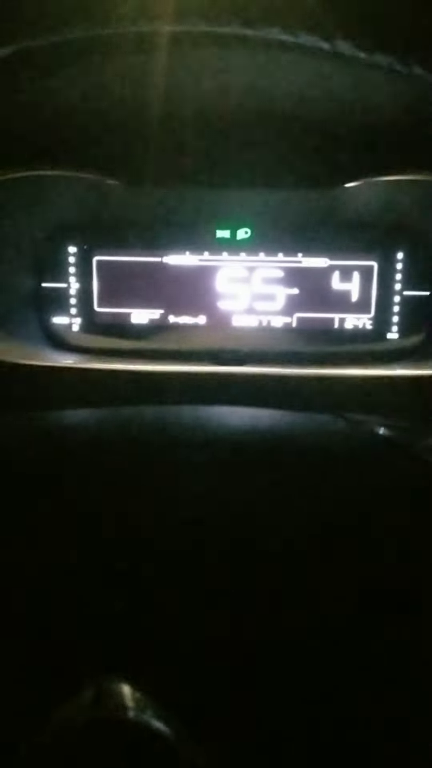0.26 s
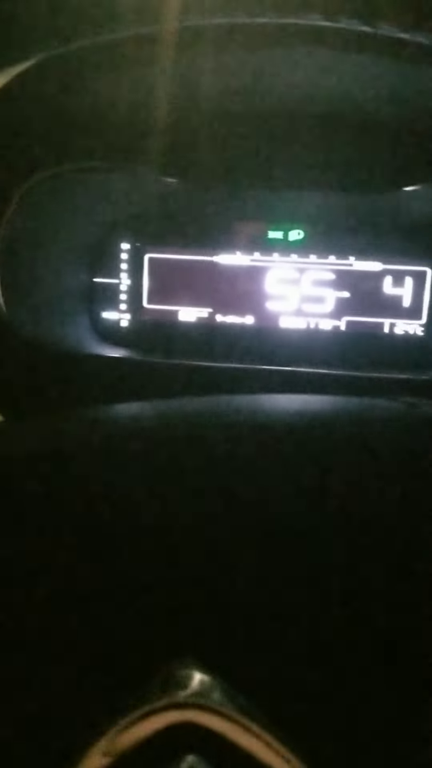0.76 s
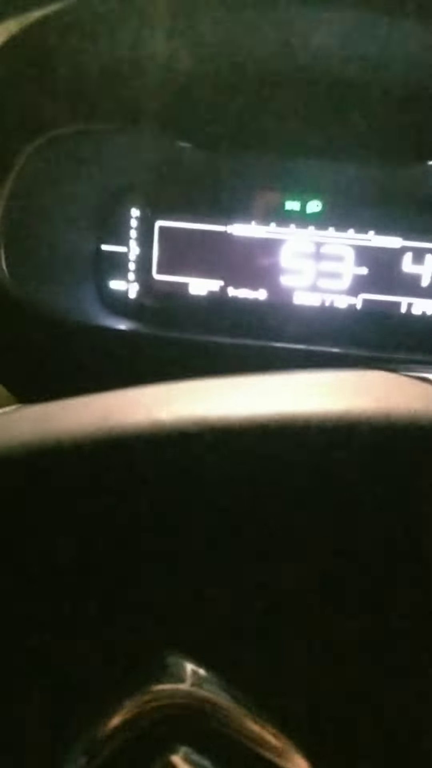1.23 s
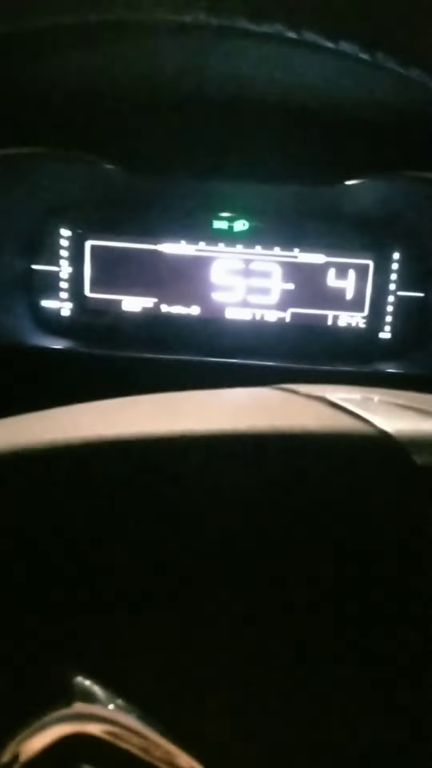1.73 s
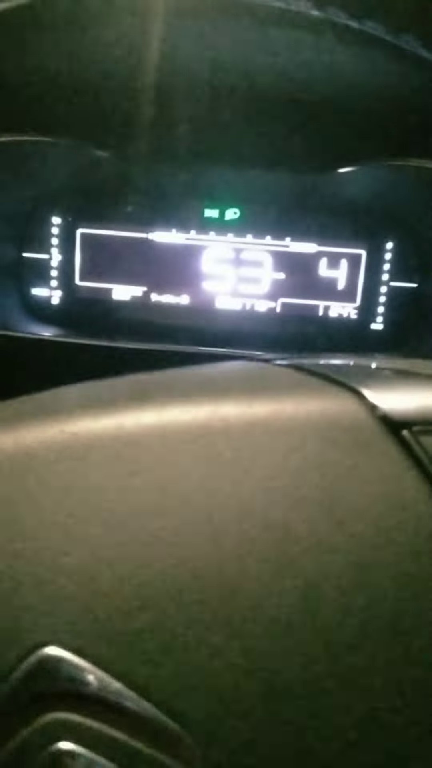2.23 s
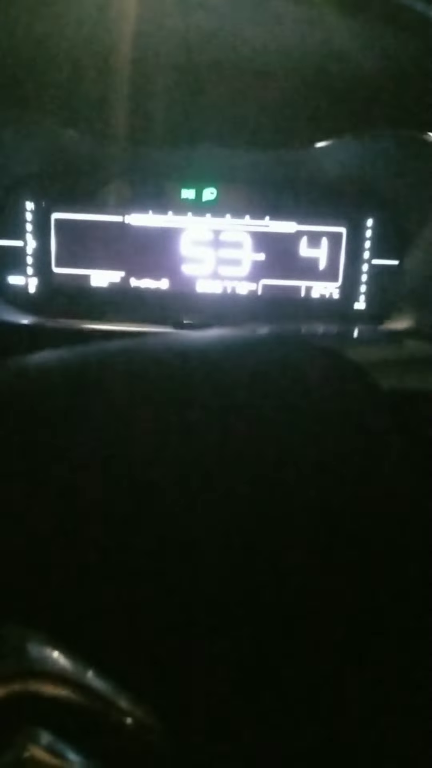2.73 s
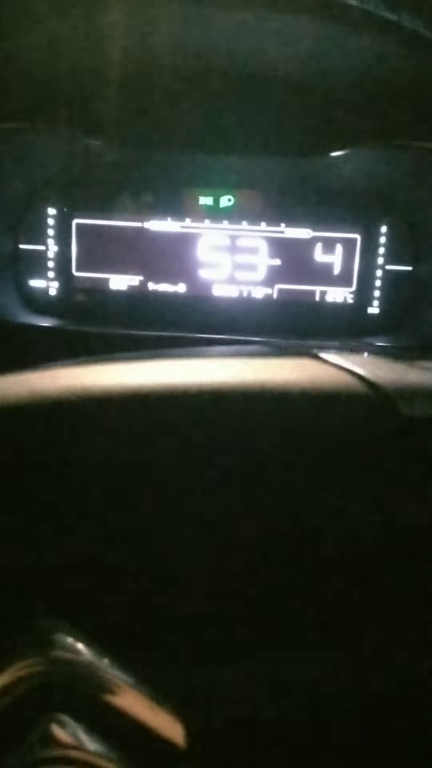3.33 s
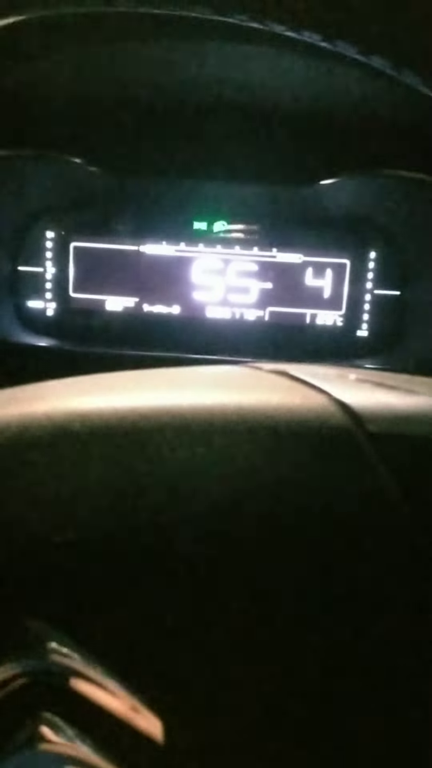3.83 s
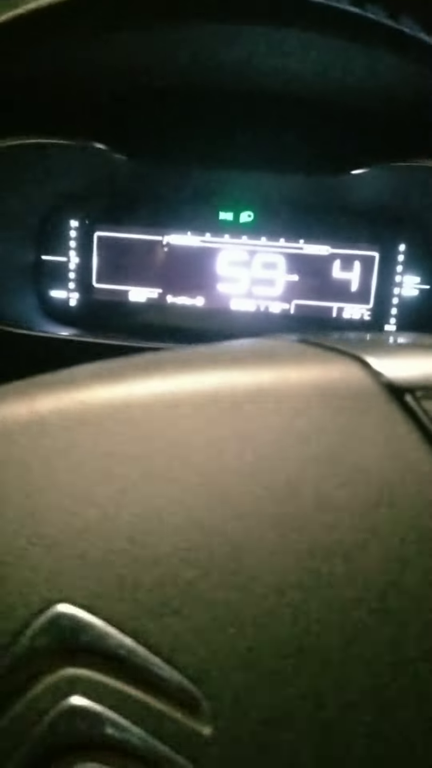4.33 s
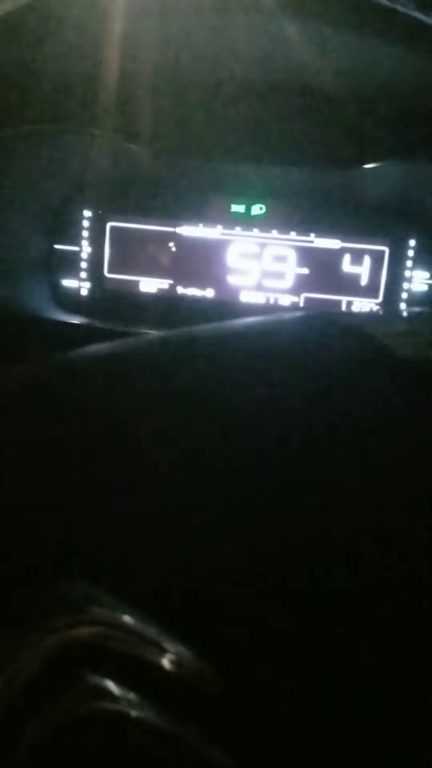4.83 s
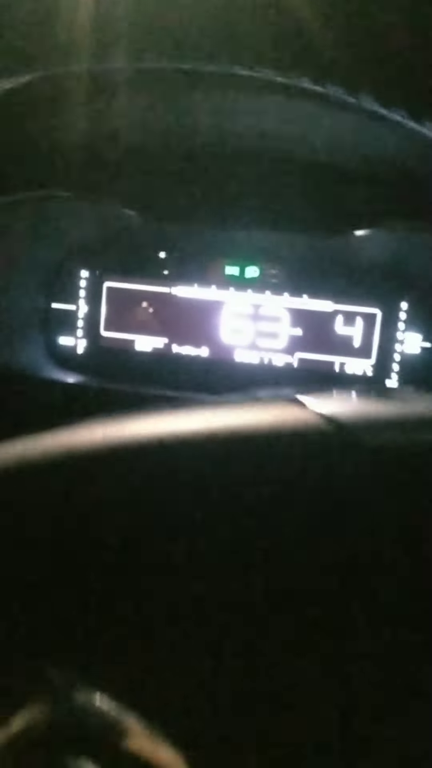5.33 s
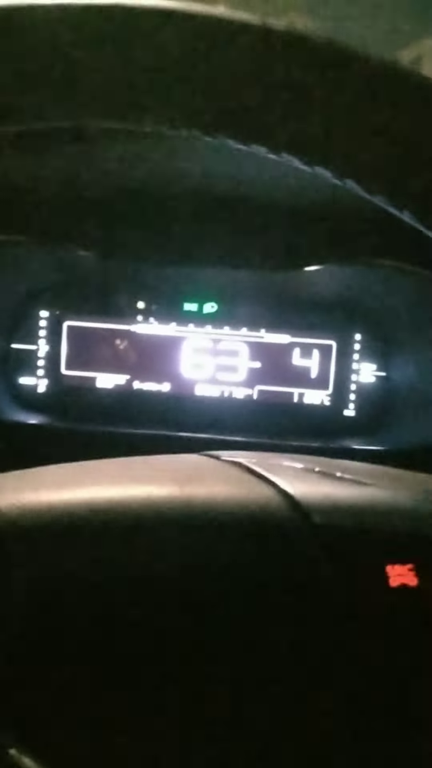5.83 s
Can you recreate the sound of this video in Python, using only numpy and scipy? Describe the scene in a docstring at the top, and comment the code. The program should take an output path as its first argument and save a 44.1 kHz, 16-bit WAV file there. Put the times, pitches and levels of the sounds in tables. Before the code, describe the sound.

Heard from the driver's seat, a turbocharged car coasts with a low engine hum and steady road rumble. The trim knocks once as the throttle opens, and the engine growls gradually higher while a faint turbo hiss climbs. The throttle then shuts, and the turbo flutters in a quick run of chattering puffs, mixed with a few trim knocks and followed by faint, thin wheezes.

```python
"""Turbo pull and flutter, from the driver's seat

A small turbocharged car coasts at town speed, pulls for a few seconds, then the throttle shuts.
Engine hum and road rumble fill the cabin; the turbo's hiss climbs with its wheel speed, then trapped
boost flutters back through the intake and trails off in thin wheezes. Trim ticks and rustles.
Two microphone ports hear the bass alike and the treble apart."""
import sys
import numpy as np
from scipy import signal
from scipy.fft import rfft, irfft, next_fast_len
from scipy.io import wavfile

SR = 44100
rng = np.random.default_rng(int(sys.argv[2]) if len(sys.argv) > 2 else 0)


def waveform_to_disk(signal):
    """Save audio, clipped to [-1, 1], as 16-bit WAV at the path in sys.argv[1]."""
    frames = np.transpose(np.atleast_2d(signal))
    scaled = np.clip(frames, -1, 1) * 32767
    samples = np.round(scaled).astype(np.int16)
    wavfile.write(sys.argv[1], SR, samples)


N = 267246
TIME = np.arange(N) / SR
FFT_SIZE = next_fast_len(N + 8192)
HZ = np.maximum(np.arange(FFT_SIZE // 2 + 1) * SR / FFT_SIZE, 1)

# How hard the engine works. Each row: time in seconds, load from 0 to 1.
LOAD = [(0, 0.24), (2.55, 0.43), (2.75, 0.46), (3.2, 0.55), (3.7, 0.81), (4.3, 0.81), (5.02, 0.91),
        (5.1, 0.61), (5.5, 0.6), (6.06, 0.44)]


def engine():
    """Wavering tones ride the firing rate; a roar through the bulkhead throbs with each firing."""
    # Engine speed. Each row: time in seconds, firings per second.
    firing_curve = [(0.0, 59.7), (1.0, 59.2), (2.5, 59.1), (2.9, 60.1), (3.5, 62.9), (4.0, 66.4),
                    (4.5, 69.6), (5.05, 73.8), (5.4, 73.6), (6.06, 69.5)]
    # Hum at the firing rate. Each row: time in seconds, level in dB.
    hum_curve = [(0, -30.5), (.5, -28.5), (1.9, -27.5), (2.4, -31), (2.7, -44), (2.95, -33), (3.45, -33.5),
                 (3.8, -37), (4.2, -33), (4.9, -28), (5.15, -32), (5.5, -39), (5.75, -32), (6.06, -33)]
    # Growl near a resonance, throttle open. Each row: firing multiple, base level in dB,
    # level of the added swell in dB, resonance in Hz, width in Hz.
    growls = [(2, -50, -32, 119, 11), (3, -55.5, -34.5, 188, 24)]
    # Overtones. Each row: firing multiple, coasting level in dB, level at full pull in dB.
    overtones = [(1.5, -50, -47), (4, -64, -56), (4.5, -70, -62), (5, -76, -63), (5.5, -80, -63),
                 (6, -72, -61), (7, -82, -59), (8, -70, -61), (9, -84, -59), (10, -84, -60),
                 (11, -86, -58.5), (12, -84, -64), (13, -84, -68), (14, -86, -72), (15, -88, -70),
                 (16, -88, -72)]
    # Gear whine: one more row of the same kind.
    gear_whine = (14.25, -90, -61)
    # The tenth multiple sings while coasting, then fades. Each row: time in seconds, level in dB.
    tenth_curve = [(0, -66), (.3, -62), (1.3, -63), (1.7, -80), (6.06, -90)]
    # Tone of the roar. Each row: frequency in Hz, noise density in dB.
    roar_spectrum = [(200, -83), (320, -71), (500, -71), (750, -76), (1100, -79), (1500, -93.5),
                     (2500, -106), (3500, -114)]
    firing_hz = envelope(firing_curve)
    phase = 2 * np.pi * np.cumsum(firing_hz) / SR

    def partial(multiple, gain):
        wander = rng.uniform(0, 2 * np.pi) + .055 * multiple * drift(6)
        return np.sqrt(2) * gain * amp(1.1 * drift(12)) * np.sin(multiple * phase + wander)

    hum = partial(1, amp(envelope(hum_curve)))
    for multiple, base_db, swell_db, hz, width in growls:
        nearness = np.sqrt(resonance(multiple * firing_hz, hz, width))
        hum += partial(multiple, amp(base_db) + throttle() * amp(swell_db) * nearness)
    whine = sum(partial(multiple, amp(coast_db + (pull_db - coast_db) * pull()))
                for multiple, coast_db, pull_db in overtones + [gear_whine])
    whine += partial(10, amp(envelope(tenth_curve)))
    # Overtones bloom as they cross the cabin's resonances.
    tones = padded_spectrum(hum) + padded_spectrum(whine) * cabin_colour() ** 2
    throb = 1 + .35 * np.sin(phase)
    roar = envelope(LOAD) ** 1.5 * throb * noise(density(roar_spectrum) * cabin_colour())
    return mic_ports(tones, 1j * tones) + roar


def turbo():
    """Compressor hiss over a broader, lower rush; both rise in pitch and level with wheel speed."""
    # Pitch of the compressor's hiss. Each row: time in seconds, centre in Hz.
    wheel_curve = [(0, 3526), (3, 4175), (3.8, 5300), (4.4, 5900), (4.7, 6280), (5.05, 6700), (5.3, 6380),
                   (5.6, 6150), (6.06, 5860)]
    centre_hz = envelope(wheel_curve)
    phase = 2 * np.pi * np.cumsum(centre_hz) / SR
    hiss = np.zeros((2, N))
    for pitch_ratio, half_width_hz, layer_db in [(.99, 570, -1.5), (.72, 1100, .5)]:
        lowpass = signal.butter(3, half_width_hz, fs=SR, output="sos")
        rush = signal.sosfilt(lowpass, rng.standard_normal((2, N)))
        shifted_up = np.sqrt(2) * rush / np.std(rush) * np.sin(pitch_ratio * phase)
        hiss += amp(layer_db + 1.5 * drift(30)) * shifted_up
    db_per_octave, open_throttle_db = 25.5, 2
    level_db = -77 + db_per_octave * np.log2(centre_hz / 6700) + open_throttle_db * throttle()
    return hiss * amp(level_db) * pan(left_db=5)


def intake_flutter():
    """Air makes the intake pipe sing: softly under load, then in torn puffs as boost escapes."""
    # Boost puffing backwards. Each row: start in seconds, length in seconds, level in dB.
    puffs = [(5.065, 0.05, -61.5), (5.097, .062, -56.5), (5.146, 0.074, -58.5), (5.215, 0.072, -56.5),
             (5.288, 0.066, -57.5), (5.348, 0.068, -57.5), (5.41, 0.075, -63.5)]
    # Pipe resonances; the low ones take over as boost runs out. Each row: pitch in Hz, width in Hz,
    # then gain in dB under load and at the first puff, mid-flutter and the last puff.
    pipe_modes = [(905, 45, -2, 2, 4, 5.5), (1176, 28, -3, -6, 8.5, 8), (1330, 110, -5, 1, -3, -7),
                  (1577, 70, -9.5, -1.5, -3, -9.5), (2010, 75, -11, -4, -8, -11),
                  (2200, 100, -16, -8, -15, -20), (2925, 60, -12, -13, -19, -17),
                  (3025, 120, -19, -15, -19, -25), (3450, 180, -20.5, -17, -22, -20),
                  (4040, 250, -18, -16, -32, -32), (5460, 300, -23, -30, -32, -32)]
    breath = amp(-71.5) * envelope(LOAD) ** 2
    torn_air = amp(2 * drift(70)) * sum(amp(db) * swell(start, length) ** 2
                                        for start, length, db in puffs)
    first_s, last_s, lowest_hz = puffs[0][0], puffs[-1][0], pipe_modes[0][0]
    song = np.zeros(N)
    for hz, width, load_db, *puff_db in pipe_modes:
        puff_gain = amp(np.interp(TIME, [first_s, (first_s + last_s) / 2, last_s], puff_db))
        tone = rng.standard_normal(N) * (breath * amp(load_db) + torn_air * puff_gain)
        radius = np.exp(-1.5 * np.pi * width / SR)
        feedback = [1, -2 * radius * np.cos(2 * np.pi * hz / SR), radius ** 2]
        for _ in range(2):   # twice, for dark valleys between the resonances
            tone = signal.lfilter([1, 0, -1], feedback, tone + 1e-18) * (1 - radius ** 2) / 2
        rasp_db = 1.25 * np.log2(hz / lowest_hz) * drift(300)   # torn air roughens the higher modes
        song += np.sqrt(SR / width / 2) * tone * amp(rasp_db)
    # Each puff carries a chuff of untuned air, darker than the one before.
    first_chuff_hz, fall_octaves_per_s = 1650, 2.6
    chuffs = gusts([(start, length, db - 4, first_chuff_hz * 2 ** (fall_octaves_per_s * (first_s - start)))
                    for start, length, db in puffs], octaves=1.3)
    return in_cabin(song, t60=.04, echo_db=-6, left_db=2.5) + chuffs


def wheezes():
    """Thin, high whistles of narrow noise trail the flutter."""
    # Each row: start in seconds, length in seconds, level in dB, centre in Hz.
    whistles = [(5.475, 0.06, -81.5, 7900), (5.585, 0.058, -80, 7450), (5.74, 0.07, -87, 7050),
                (5.66, 0.18, -91, 8400), (5.83, .25, -90, 8750)]
    return gusts(whistles, octaves=.03)


def road():
    """Suspension thud, cabin boom and tyre hiss follow the surface; the boom swells on a hard pull."""
    # Roughness of the road. Each row: time in seconds, level swing in dB.
    surface_curve = [(0, -0.5), (.15, 4), (.4, 0.5), (1.3, -0.5), (2.2, -2), (3.0, 1), (3.7, -1.5),
                     (4.0, 1.5), (4.3, 0), (4.6, 6), (4.9, -0.5), (5.2, 4.5), (5.5, 2.5), (6.06, 4.5)]
    # Tone of the suspension's thud. Each row: frequency in Hz, noise density in dB.
    thud_spectrum = [(12, -100), (22, -77), (30, -64), (42, -52), (58, -55), (72, -51.5), (85, -51.5),
                     (110, -54.5), (170, -60.5), (260, -73)]
    # Tone of the tyres. Each row: frequency in Hz, noise density in dB.
    tyre_spectrum = [(100, -76.5), (200, -65), (350, -71), (600, -80), (1000, -87.5), (1400, -90),
                     (2000, -102), (2600, -114)]
    surface_db = envelope(surface_curve)
    tyres = amp(.68 * surface_db) * noise(density(tyre_spectrum) * cabin_colour())
    thud = amp(.8 * surface_db) * noise(density(thud_spectrum) * cabin_colour())
    boom = amp(-50 + .4 * surface_db + 3.5 * pull()) * noise(resonance(HZ, centre=125.1, width=15.3))
    return thud + boom + tyres


def trim_ticks():
    """The trim ticks and knocks: single clicks softened by a broad band-pass."""
    # Each row: time in seconds, peak level in dB, centre in Hz, width in octaves.
    hits = [(2.6158, -33, 700, 1.56), (2.616, -52.5, 2500, 1.3), (2.641, -57, 2600, .7),
            (5.164, -51, 2200, .5), (4.549, -54, 1710, .9), (5.1592, -35, 600, 1.5),
            (5.1624, -28.5, 380, 1.3), (5.1672, -28.5, 510, 0.97), (5.19, -33, 416, 0.54),
            (5.208, -30, 447, 0.52)]
    clicks = np.zeros(N)
    for start, db, hz, octaves in hits:
        impulse = (np.arange(N) == round(start * SR)) + 1e-18
        click = band(band(impulse, hz, octaves), hz, octaves + 1)
        clicks += amp(db) * click / np.abs(click).max()
    return in_cabin(clicks, t60=.02, echo_db=-7, left_db=.5)


def trim_rustles():
    """The trim rustles in short, bright brushes of noise."""
    # Each row: start in seconds, length in seconds, level in dB, centre in Hz.
    brushes = [(2.865, 0.027, -78, 5500), (4.08, .025, -73, 4000), (4.82, 0.018, -63.5, 4300),
               (4.885, 0.019, -73, 7100), (4.955, 0.024, -71, 6800), (5.09, 0.051, -68, 3900),
               (5.115, 0.015, -73, 8500), (5.16, 0.025, -73, 8400), (5.235, 0.023, -74, 8500),
               (5.31, 0.022, -63.5, 4500), (5.40, .015, -73, 4000), (5.47, 0.15, -80.5, 8600)]
    return gusts(brushes, octaves=1)


def wind():
    """Faint wind flickers at the window seals, a little louder under load."""
    # Tone of the wind. Each row: frequency in Hz, noise density in dB.
    wind_spectrum = [(1200, -125), (2100, -106), (2800, -108), (4200, -115), (5600, -119), (7000, -120.5),
                     (8000, -121), (13000, -120.5)]
    return amp(3 * envelope(LOAD) + 1.4 * drift(60)) * noise(density(wind_spectrum))


def throttle():
    """Throttle position: 0 shut, 1 open."""
    opens_s, shuts_s, travel_s = 2.62, 5.02, .16
    return np.clip(np.minimum(TIME - opens_s, shuts_s + travel_s - TIME) / travel_s, 0, 1)


def pull():
    """How hard the engine pulls, 0 to 1: open throttle at high load."""
    from_load, full_load = .6, .85
    return throttle() * np.clip((envelope(LOAD) - from_load) / (full_load - from_load), 0, 1)


def cabin_colour():
    """The cabin's air and panel resonances, as a gain at each frequency."""
    # Peaks and the dips between them. Each row: centre in Hz, width in Hz, boost or cut in dB.
    cabin_modes = [(150, 20, -2), (172, 25, 2), (200, 20, -4), (222, 30, 5), (256, 22, -4), (290, 35, 3),
                   (365, 45, 4), (410, 35, -3), (478, 35, 5), (520, 25, 3), (548, 30, -4), (630, 50, 4.5),
                   (690, 30, 1.5), (735, 45, 4.5), (800, 40, -2.5), (920, 50, 2.5), (1012, 30, -4.5),
                   (1080, 110, 3), (1200, 40, 2.5), (1245, 50, -3), (1350, 40, 2)]
    return amp(sum(db * resonance(HZ, hz, width) for hz, width, db in cabin_modes))


def in_cabin(x, t60, echo_db, left_db):
    """A point source reaches both ports directly, then by a burst of short reflections."""
    paths = rng.standard_normal((2, 4096)) * amp(-60 * np.arange(4096) / SR / t60)
    paths *= amp(echo_db) / np.sqrt(np.sum(paths ** 2, axis=1, keepdims=True))
    paths[:, 0] = 1
    return signal.fftconvolve(x[None], paths, axes=1)[:, :N] * pan(left_db)


def mic_ports(mid, side):
    """Mid and side spectra become left and right sound: narrow in the bass, wide in the treble."""
    # Likeness of the two ports. Each row: frequency in Hz, correlation from 0 to 1.
    likeness = [(40, .997), (60, .991), (125, .98), (180, .95), (310, .62), (530, .7), (910, .32),
                (1580, .2), (2720, .2), (5000, .18)]
    # Stereo balance. Each row: frequency in Hz, left over right in dB.
    balance = [(60, -.2), (140, .7), (210, -1), (330, -1.8), (500, -.8), (760, 2), (1170, -1), (1780, 2),
               (2720, 4.5), (5000, 5), (9000, 2), (12000, 0)]
    # Phase between the ports. Each row: frequency in Hz, left's lead in radians.
    left_lead = [(0, 0), (780, .5), (1120, 1.2), (1640, 5.6), (2500, 6.6), (3500, 2 * np.pi)]
    alike = over_frequency(likeness)
    mid, side = np.sqrt((1 + alike) / 2) * mid, np.sqrt((1 - alike) / 2) * side
    lead = np.interp(HZ, *np.transpose(left_lead))
    lean = amp(over_frequency(balance) / 2) * np.exp(.5j * lead)
    return irfft([(mid + side) * lean, (mid - side) / lean], FFT_SIZE)[:, :N]


def noise(gain):
    """Stereo noise at the ports, shaped by a gain per root Hz."""
    mid, side = rfft(rng.standard_normal((2, FFT_SIZE))) * gain * np.sqrt(SR / 2)
    return mic_ports(mid, side)


def gusts(rows, octaves):
    """Bursts of banded noise, wide and leaning left."""
    bursts = np.zeros((2, N))
    white = rng.standard_normal((2, N))
    for start, length, db, hz in rows:
        hiss = band(white, hz, octaves)
        bursts += amp(db) * swell(start, length) * hiss / np.std(hiss)
    return bursts * pan(left_db=3)


def swell(start, length):
    """A gust's shape: quick rise, rounded top, quick fall."""
    return np.sqrt(np.sin(np.pi * np.clip((TIME - start) / length, 0, 1)).clip(0))


def drift(rate):
    """Random wobble of about unit size, with rate new values a second."""
    steps = rng.standard_normal(int(N / SR * rate) + 2)
    return np.interp(TIME * rate, np.arange(len(steps)), steps)


def band(x, hz, octaves):
    """Band-pass around a centre."""
    edges = np.minimum(hz * 2.0 ** (np.array([-.5, .5]) * octaves), .45 * SR)
    return signal.sosfilt(signal.butter(2, edges, "band", fs=SR, output="sos"), x)


def resonance(hz, centre, width):
    """A bell curve, 1 at its centre."""
    return 1 / (1 + (2 * (hz - centre) / width) ** 2)


def padded_spectrum(x):
    """Spectrum of a tone mirrored past both ends, so it starts and stops without a click."""
    pad = FFT_SIZE - N
    fade = np.linspace(1, 0, pad) ** 2
    return rfft(np.r_[x, fade * x[::-1][:pad] + (fade * x[:pad])[::-1]])


def density(rows):
    """Gain from (Hz, dB) rows, falling 40 dB an octave above the last."""
    return amp(over_frequency(rows) - 40 * np.log2(np.maximum(HZ / rows[-1][0], 1)))


def over_frequency(rows):
    """A curve through (Hz, value) rows, joined in log frequency."""
    hz, value = np.transpose(rows)
    return np.interp(np.log(HZ), np.log(np.maximum(hz, 1)), value)


def envelope(rows):
    """A curve through (seconds, value) rows, one value a sample."""
    return np.interp(TIME, *np.transpose(rows))


def pan(left_db):
    """Two channel gains, the left louder by left_db."""
    return amp([[left_db / 2], [-left_db / 2]])


def amp(db):
    """Decibels to gain."""
    return 10 ** (np.asarray(db) / 20)


def scene():
    """Everything heard from the driver's seat."""
    return (engine() + road() + wind() + turbo() + intake_flutter()
            + trim_rustles() + wheezes() + trim_ticks())


def record(dry):
    """A steep low-pass takes off the very top."""
    return signal.sosfilt(signal.cheby2(12, 50, 13900, fs=SR, output="sos"), dry)


dry = scene()
out = record(dry)
waveform_to_disk(out)
```